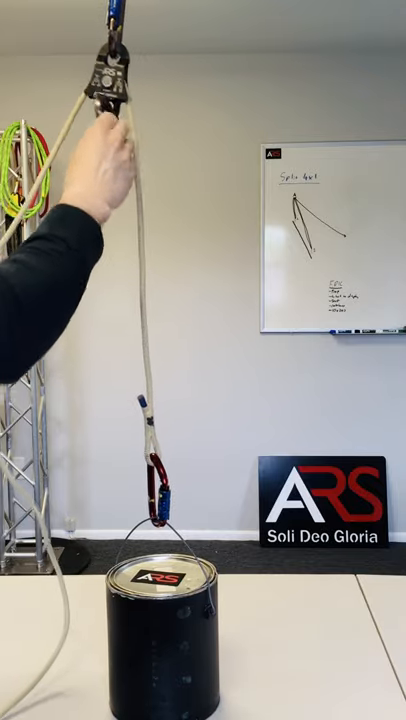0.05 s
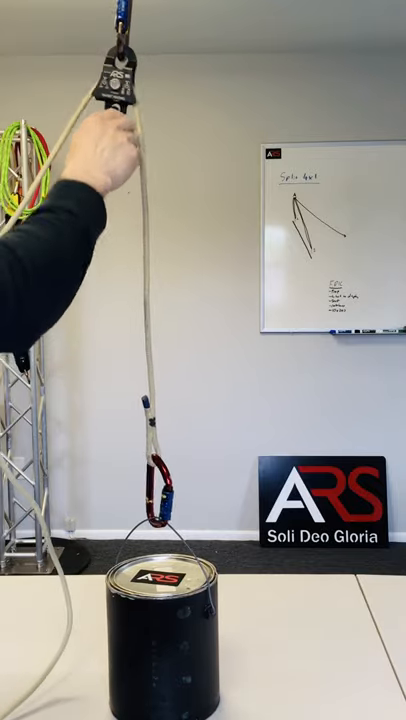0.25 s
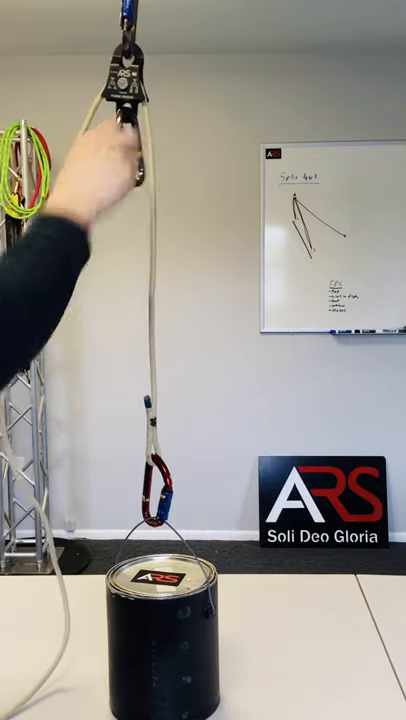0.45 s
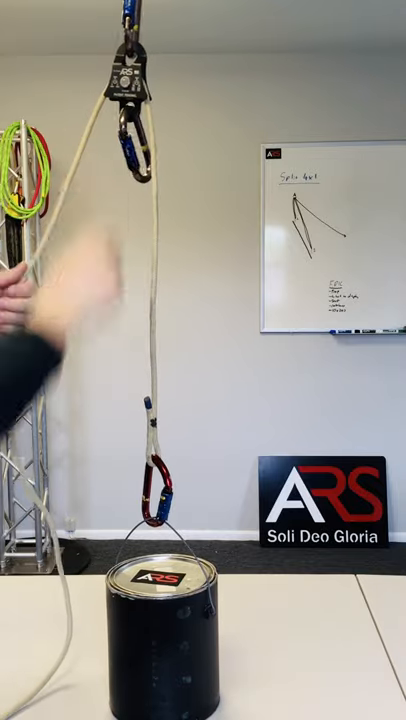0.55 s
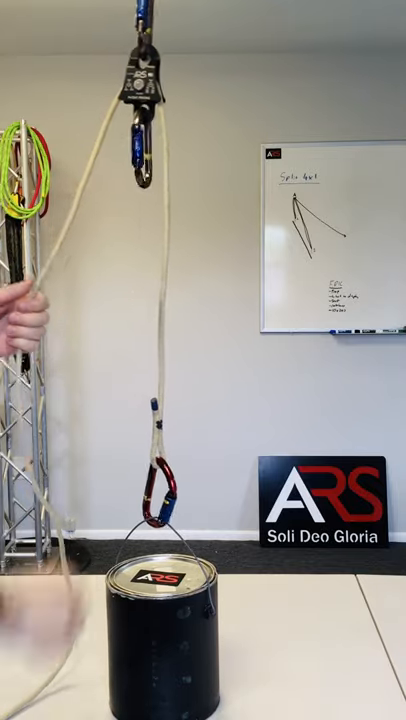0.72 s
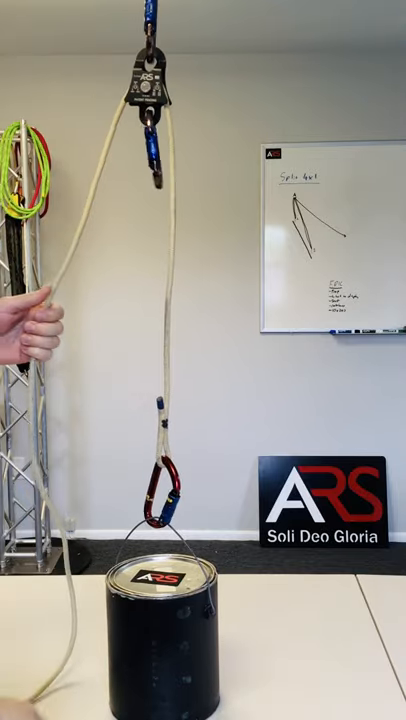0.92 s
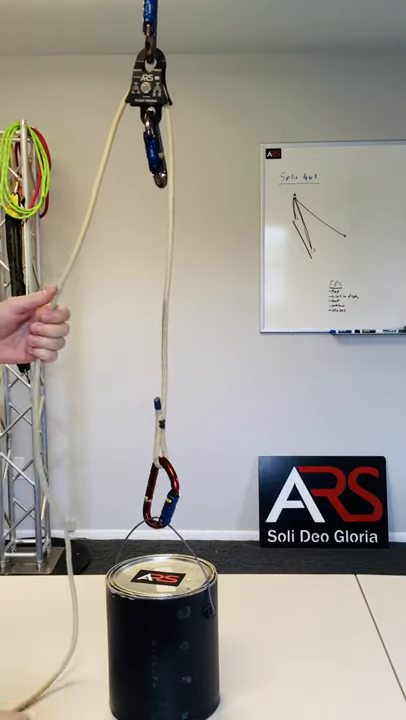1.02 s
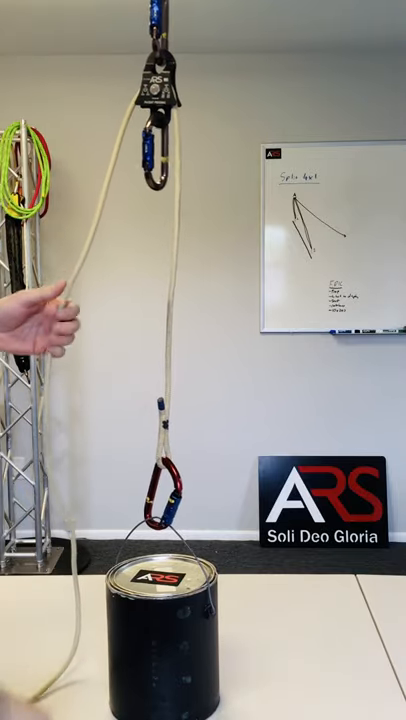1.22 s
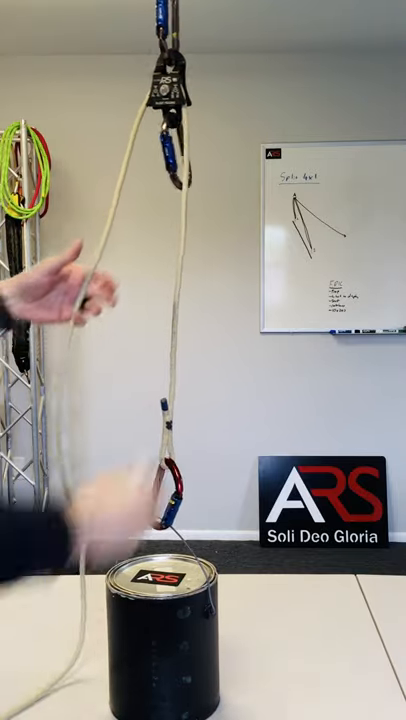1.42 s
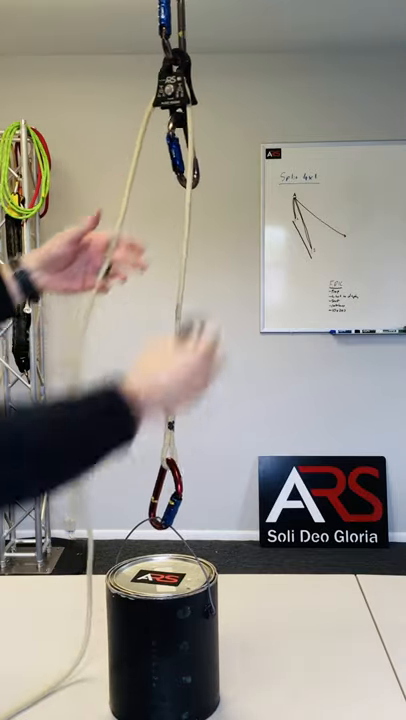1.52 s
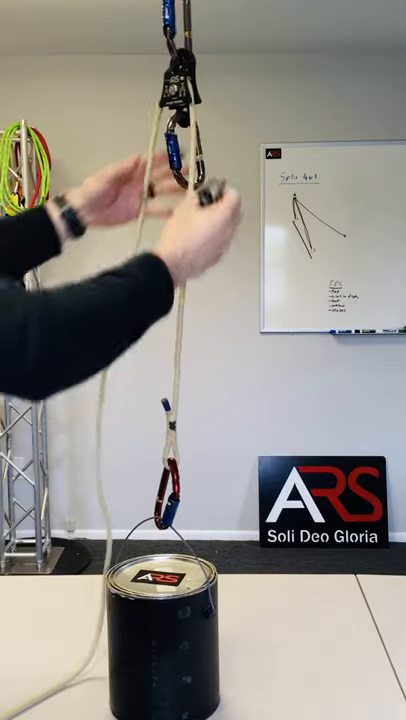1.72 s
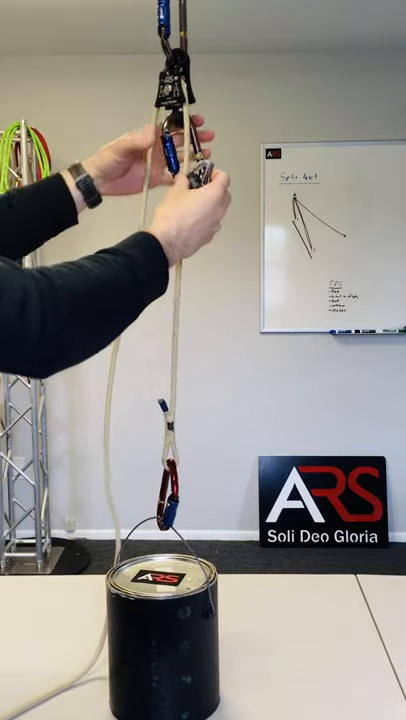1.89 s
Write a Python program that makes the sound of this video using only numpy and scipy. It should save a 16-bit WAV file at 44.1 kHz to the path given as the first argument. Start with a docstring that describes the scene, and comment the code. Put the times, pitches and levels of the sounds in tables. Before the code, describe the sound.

A metal carabiner snaps shut on a pulley, then slack rope slaps softly onto a table.

```python
"""In a quiet room, over ventilation and mains hum, a carabiner is clipped to a hanging pulley.
Its gate scrapes past and snaps shut, exciting the metal's bright modes, and the rig shudders.
The carabiner swings and knocks lightly on the pulley, then a slack rope slaps onto a table.
Fingers and sleeves rustle by friction; the room reverberates with the metal and the rope."""
import sys
import numpy as np
from scipy import signal
from scipy.fft import rfft, irfft
from scipy.io import wavfile

SR = 44100
rng = np.random.default_rng(int(sys.argv[2]) if len(sys.argv) > 2 else 0)


def transcribe(signal):
    """Save signal, clipped to [-1, 1], as a 16-bit WAV file at the path in sys.argv[1]."""
    frames = np.atleast_2d(signal).T
    limited = np.clip(frames, -1, 1)
    pcm = np.round(limited * 32767).astype(np.int16)
    wavfile.write(sys.argv[1], SR, pcm)


N = 85995
T = np.arange(N) / SR
CRACK_T60_S = .022

# hand-damped modes of the carabiner: (frequency [Hz], relative level [dB], T60 [s])
CARABINER_MODES = [(1850, -26, .022), (2790, -24, .016), (3750, -18, .013), (4120, -20, .028),
                   (4430, -18, .03), (5220, -12.5, .031), (5620, -13, .026), (5840, -12, .033),
                   (6394, -5.5, .025), (6773, -11.5, .03), (8830, -12, .028), (9020, -1, .019),
                   (11170, -12.5, .013), (12720, -12.5, .018), (13900, -15, .015)]
# noise of a light impact, knock or slap: (frequency [Hz], relative level [dB])
IMPACT_SPECTRUM = [(200, -24), (1200, -20), (2000, -11), (2600, 0), (3300, -4), (4300, -9), (5000, -15),
                   (8000, -16), (11000, -26), (16000, -33)]


def from_db(db):
    """Decibels to amplitude ratio."""
    return 10 ** (np.asarray(db) / 20)


def rms_one(x):
    """Normalisation to unit rms."""
    return x / np.sqrt(np.mean(x ** 2) + 1e-20)


def at_hz(points, hz):
    """Interpolation on a log-frequency axis."""
    f, value = np.transpose(points)
    return np.interp(np.log(np.maximum(hz, 1)), np.log(f), value)


def envelope(curve):
    """Gain over time from (time [s], level [dB]) rows."""
    return from_db(np.interp(T, *np.transpose(curve)))


def colour(x, spectrum):
    """Spectral shaping of a steady signal, at unit rms."""
    bin_hz = np.arange(N // 2 + 1) * SR / N
    return rms_one(irfft(rfft(x) * from_db(at_hz(spectrum, bin_hz)), N))


def noise(spectrum):
    """Coloured Gaussian noise at unit rms."""
    return colour(rng.standard_normal(N), spectrum)


def slips(per_s):
    """Stick-slip friction as a Poisson train of uneven impulses."""
    return (rng.random(N) < per_s / SR) * rng.standard_normal(N)


def decay(t60):
    """Exponential damping: 60 dB in t60 seconds."""
    return from_db(-60 * T / t60)


def ring(modes):
    """Free vibration: a sum of damped sinusoids of random polarity."""
    return sum(rng.choice([-1, 1]) * from_db(db) * decay(t60) * np.sin(2 * np.pi * hz * T)
               for hz, db, t60 in modes)


def delay(x, s):
    """A delay of s seconds."""
    return np.concatenate([np.zeros(max(int(s * SR), 0)), x])[:N]


def convolve(x, response):
    """A linear system's output, from its impulse response."""
    return signal.fftconvolve(x, response)[:N]


def room_response():
    """A diffuse field builds quickly and is absorbed sooner in the treble; unit energy."""
    # reverberation time: (frequency [Hz], T60 [s])
    room_t60 = [(150, 0.4), (1000, 0.43), (3000, 0.37), (6000, 0.37), (9000, 0.31), (15000, .28)]
    edges, tail = np.geomspace(80, 18000, 13), 0
    for low, high in zip(edges, edges[1:]):
        bandpass = signal.butter(2, [low, high], "band", fs=SR, output="sos")
        band = signal.sosfilt(bandpass, rng.standard_normal(N))
        tail += band * decay(at_hz(room_t60, np.sqrt(low * high)))
    tail *= 1 - np.exp(-(T / .0061) ** 2)  # reflections build up
    return tail / np.sqrt(np.sum(tail ** 2))


def background():
    """Broadband air noise lies under a drone and a hum with slow, random amplitude modulation."""
    # room air: (frequency [Hz], relative level [dB])
    air_spectrum = [(20, -2), (50, 1), (85, 0), (150, 0.5), (250, -6.5), (400, -15.5), (650, -22.5),
                    (1200, -25), (2300, -22.5), (4500, -27), (9000, -28.3), (15500, -27.5)]
    # ventilation drone and mains hum: (frequency [Hz], rms level [dB], modulation depth [ratio])
    tones = [(48.4, -59, .25), (119.1, -57.5, .08)]
    out = from_db(-61) * noise(air_spectrum)
    for hz, db, depth in tones:
        waver = 1 + depth * noise([(3, 0), (8, -10), (40, -60), (200, -120)])
        out += np.sqrt(2) * from_db(db) * waver * np.sin(2 * np.pi * (hz * T + rng.random()))
    return out


def sleeves():
    """Friction in cloth: dense slips merge into a rustle as the arms reach up."""
    # rustle: (time [s], level [dB])
    rustle_levels = [(0, -71), (.46, -68.5), (.56, -75), (.68, -71.5), (.8, -86.5), (1.3, -81),
                     (1.44, -70.5), (1.52, -64), (1.6, -63), (1.7, -65), (1.82, -67), (1.95, -65)]
    # cloth: (frequency [Hz], relative level [dB])
    cloth_spectrum = [(200, 0.5), (600, -4.5), (1000, 0.5), (2500, 0.5), (4500, -5.5), (7000, -4.5),
                      (10000, -7), (16000, -9.5)]
    return envelope(rustle_levels) * colour(slips(per_s=15000), cloth_spectrum)


def fingers():
    """Friction of fingers working the gate gives a fine rub and a hollow note."""
    # rub: (time [s], level [dB])
    rub_levels = [(0, -62), (.06, -63), (.13, -63.5), (.18, -65), (.23, -58), (.3, -67.5), (.4, -98)]
    # rub: (frequency [Hz], relative level [dB])
    rub_spectrum = [(100, -6), (280, 4), (500, -2), (750, -9.5), (1000, -3), (1500, -7.5), (2600, 5),
                    (4500, -6.5), (10000, -24), (16000, -31)]
    # hollow note: (time [s], level [dB])
    hollow_levels = [(0, -74), (.06, -73.5), (.11, -62.5), (.14, -62), (.175, -63.5), (.21, -75.5),
                     (.25, -100)]
    # hollow note: (frequency [Hz], relative level [dB])
    hollow_spectrum = [(150, -24), (250, -3), (320, -15.5), (400, -1), (490, -0.5), (620, -12.5),
                       (1000, -19), (3000, -49.5)]
    rub = envelope(rub_levels) * colour(slips(per_s=4400), rub_spectrum)
    hollow = envelope(hollow_levels) * colour(slips(per_s=670), hollow_spectrum)
    return rub + hollow


def rope():
    """Impacts of falling loops excite the table's modes; the rope slides to rest with friction."""
    # impacts: (time [s], gain [dB], pitch [Hz], thud gain against the slap [dB])
    slaps = [(1.0528, -46, 2900, -15), (1.0625, -45, 2850, -9), (1.071, -48, 2700, -4),
             (1.085, -51, 2600, -1), (1.1095, -46, 2400, -11), (1.1265, -47, 2620, 2),
             (1.132, -46, 2520, 0), (1.139, -42.5, 2570, -2), (1.160, -50, 2480, 4),
             (1.1958, -46, 2400, -2), (1.235, -64, 2300, 15)]
    # table top: (frequency [Hz], relative level [dB], T60 [s])
    table_modes = [(72, -12, .15), (155, -8, .24), (196, -8, .2), (255.6, -10.5, 0.13), (430, -25, 0.051)]
    # dull patter on the table: (frequency [Hz], relative level [dB])
    patter_spectrum = [(80, -12), (170, 3), (300, 0), (550, -6), (1300, -6), (2200, -12), (5000, -35)]
    # sliding rope: (time [s], level [dB])
    slide_levels = [(.95, -79), (1.045, -74), (1.08, -61), (1.115, -59), (1.14, -50), (1.17, -54),
                    (1.205, -58), (1.25, -77), (1.34, -98)]
    # sliding rope: (frequency [Hz], relative level [dB])
    slide_spectrum = [(100, -8), (250, 2.5), (600, -1), (1300, -1), (1900, -4.5), (2500, 2), (4000, -14.5),
                      (5200, -15.5), (8000, -21), (11000, -26), (16000, -35)]
    out = envelope(slide_levels) * colour(slips(per_s=2500), slide_spectrum)
    for s, db, hz, thud_db in slaps:
        slap = noise(IMPACT_SPECTRUM) * decay(t60=.023) + ring([(hz, -3, .04)])
        thud = ring(table_modes) + from_db(-7) * noise(patter_spectrum) * decay(t60=.04)
        out += from_db(db) * delay(slap + from_db(thud_db) * thud, s)
    return out


def knocks():
    """Light impacts of the carabiner set the pulley into free vibration."""
    # contacts, first in the hand, then swinging: (time [s], gain [dB])
    contacts = [(.028, -51), (.142, -49), (0.1681, -41), (.430, -61), (.444, -56), (.4565, -54),
                (.475, -59), (.495, -55.5), (.5814, -63), (.602, -59), (.6405, -54), (.658, -56),
                (.69, -65)]
    # pulley: (frequency [Hz], relative level [dB], T60 [s])
    pulley_modes = [(686, -14, .025), (1480, -11, .02), (1780, -7, .03), (2640, -9, .018),
                    (3300, -10, .012), (3620, -6, .027), (6060, -11, .012)]
    out = 0
    for s, db in contacts:
        knock = ring(pulley_modes) + from_db(-1) * noise(IMPACT_SPECTRUM) * decay(CRACK_T60_S)
        out += from_db(db) * delay(knock, s)
    return out


def shudder():
    """The rig's transient response as the carabiner seats: a dull ring and a throb sagging in pitch."""
    # hanging rig: (frequency [Hz], level [dB], T60 [s])
    rig_modes = [(161, -49.5, 0.23), (261.4, -53, .16), (450, -61.5, .08)]
    attack_s, hold_s, t60_s, sag_s = .006, .058, .16, .025
    hz = 52 + 32 * np.exp(-T / sag_s)
    fall_db = 60 * np.maximum(T - hold_s, 0) / t60_s
    swell = np.minimum(T / attack_s, 1) * from_db(-41 - fall_db)
    throb = swell * np.sin(2 * np.pi * np.cumsum(hz) / SR)
    return delay(throb + ring(rig_modes), s=.216)


def gate_scrape():
    """Stick-slip friction of the gate on the pulley's eye drives the carabiner's modes."""
    # scrape: (time [s], level [dB])
    scrape_levels = [(0, -68), (.06, -68), (.09, -82), (.14, -75.5), (.15, -54), (.166, -51), (.2, -54),
                     (.21, -75.5), (.23, -110)]
    # dry rasp of metal on metal: (frequency [Hz], relative level [dB])
    rasp_spectrum = [(1000, -20), (2200, -7), (4700, -8), (5500, 1), (6900, 0), (7600, -7), (9500, -6),
                     (15000, -18)]
    force = slips(per_s=2500)
    resonance = rms_one(convolve(force, ring(CARABINER_MODES)))
    rasp = from_db(-2) * colour(force, rasp_spectrum)
    return envelope(scrape_levels) * rms_one(resonance + rasp)


def gate_clicks():
    """Impulsive excitation: each contact of the gate radiates a bright crack and a damped ring."""
    # contacts: (time [s], gain [dB], extra gain of the crack [dB])
    contacts = [(0.0279, -31, -0.5), (0.142, -40, 4), (0.1678, -25, -0.5), (0.18, -32, -1),
                (.2093, -15, -6), (.2130, -11, 8), (0.2141, 1, -4), (.2156, -14, 4), (.2187, -11, -5),
                (0.2474, -28, 17)]
    # crack: (frequency [Hz], relative level [dB])
    crack_spectrum = [(200, -23), (900, -24), (1800, -8), (4000, -4.5), (7500, -1.5), (10300, -2.5),
                      (13000, 3), (16000, -7)]
    # faint after-ring of the frame: (frequency [Hz], relative level [dB], T60 [s])
    frame_modes = [(5845, -49, .4), (6270, -52, 0.35), (6100, -50, .42), (6480, -52, .42), (8822, -49, .37),
                   (9005, -51, .3)]
    out = 0
    for s, db, crack_db in contacts:
        crack = from_db(-18.5 + crack_db) * noise(crack_spectrum) * decay(CRACK_T60_S)
        ringing = from_db(-14) * ring(CARABINER_MODES) + ring(frame_modes)
        out += from_db(db) * delay(crack + ringing, s)
    return out


def scene():
    """Superposition of all direct sound and the reverberation of gate, knocks and rope."""
    gate, swing, cord = gate_clicks() + gate_scrape(), knocks(), rope()
    into_room = from_db(-4.5) * gate + from_db(-2.5) * swing + from_db(-4) * cord
    reverb = convolve(into_room, room_response())
    return (gate + swing + cord + reverb + shudder() + fingers() + sleeves() + background())[None]


def record(dry):
    """Band limiting: an elliptic low-pass cuts steeply above 15.7 kHz."""
    return signal.sosfilt(signal.ellip(10, .1, 80, 15700, fs=SR, output="sos"), dry)


dry = scene()
out = record(dry)
transcribe(out)
```